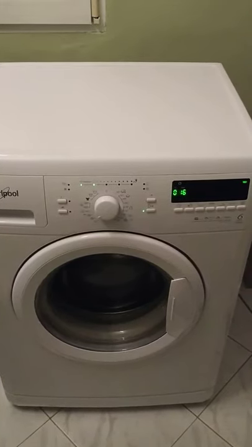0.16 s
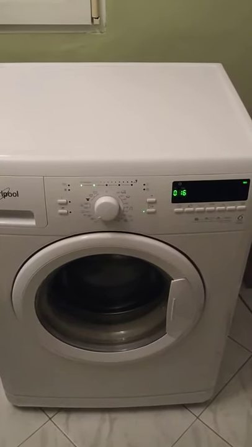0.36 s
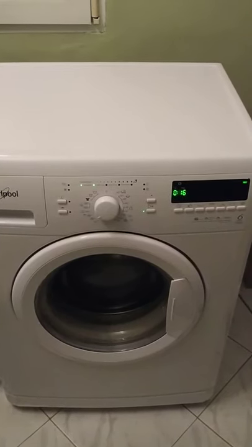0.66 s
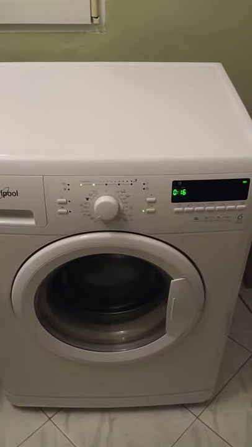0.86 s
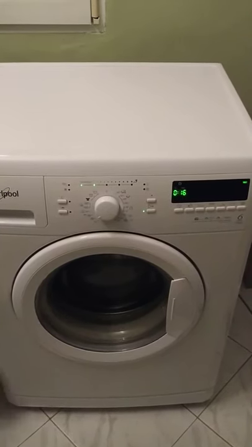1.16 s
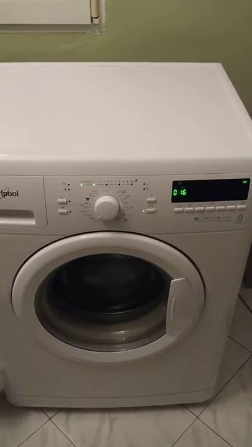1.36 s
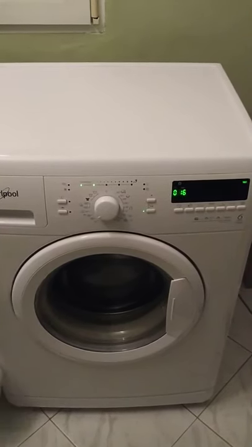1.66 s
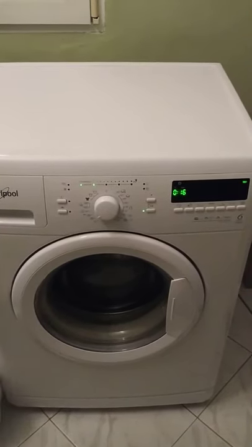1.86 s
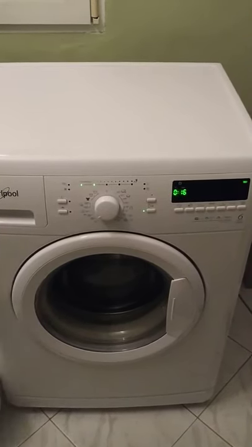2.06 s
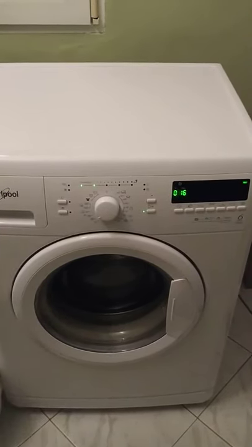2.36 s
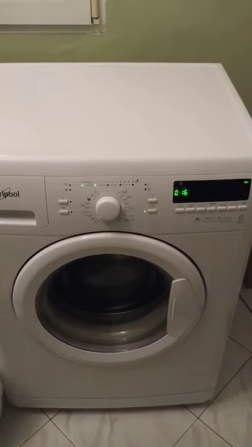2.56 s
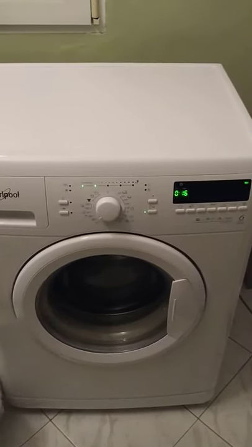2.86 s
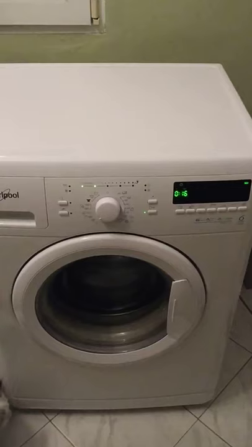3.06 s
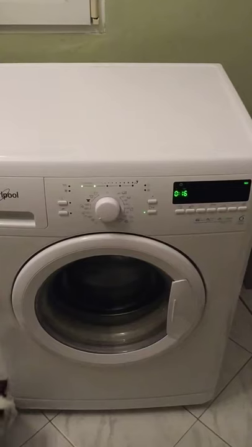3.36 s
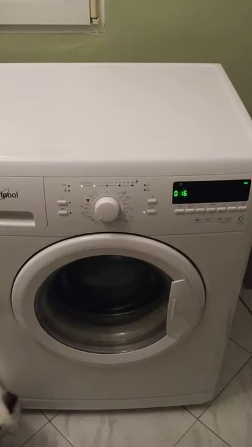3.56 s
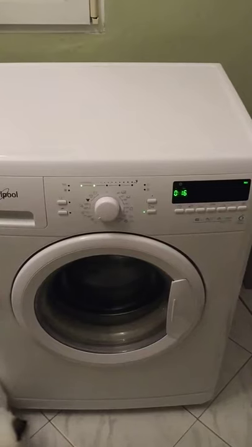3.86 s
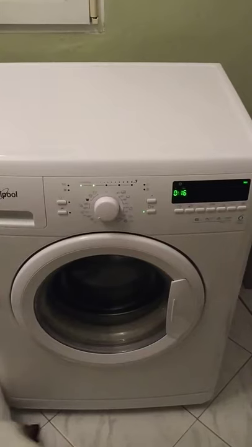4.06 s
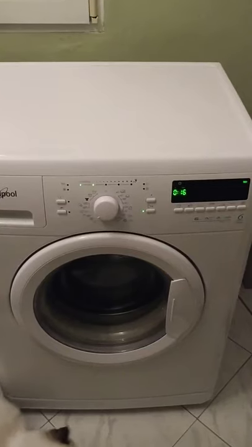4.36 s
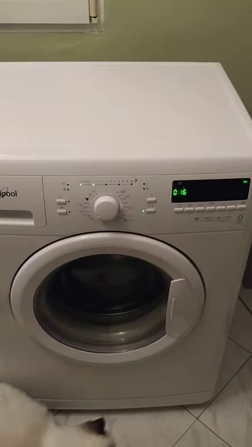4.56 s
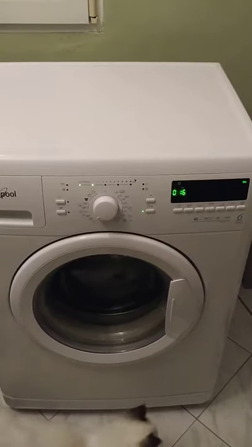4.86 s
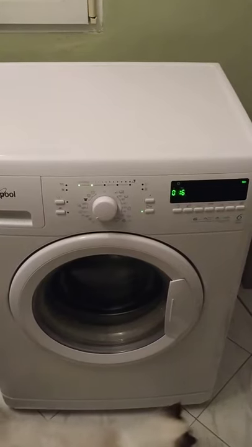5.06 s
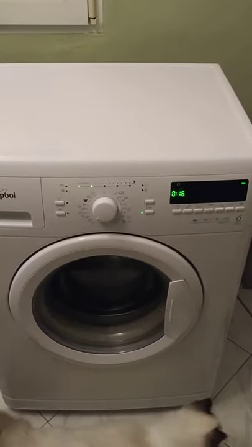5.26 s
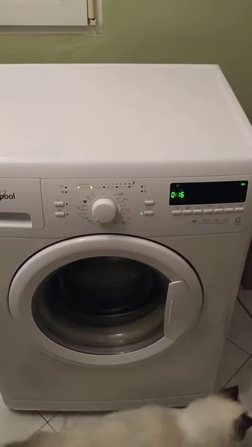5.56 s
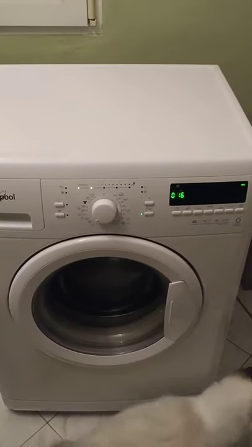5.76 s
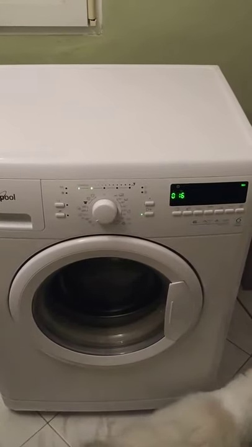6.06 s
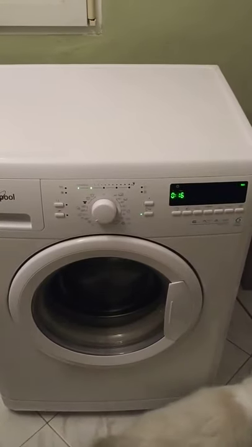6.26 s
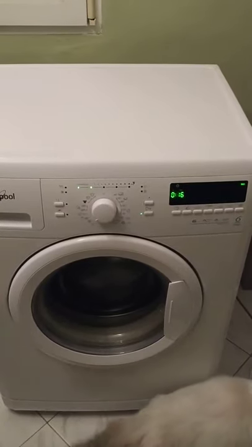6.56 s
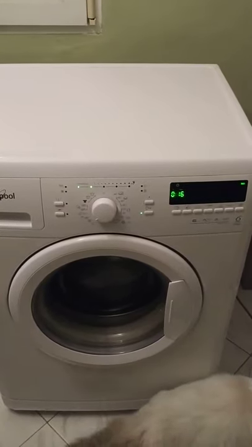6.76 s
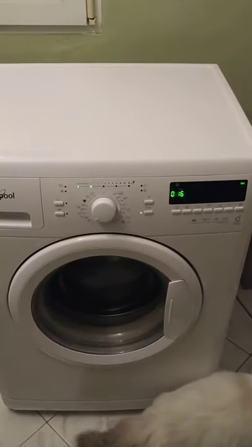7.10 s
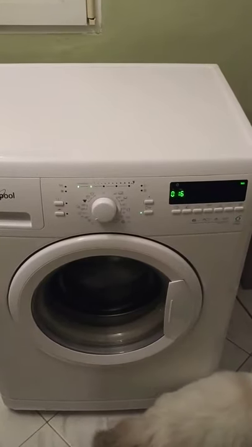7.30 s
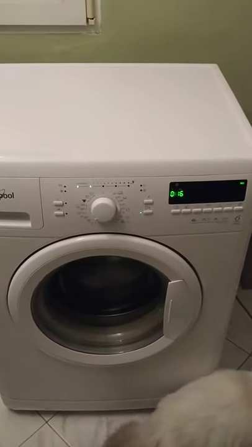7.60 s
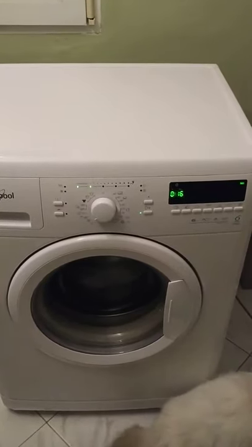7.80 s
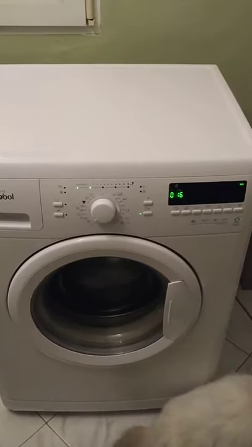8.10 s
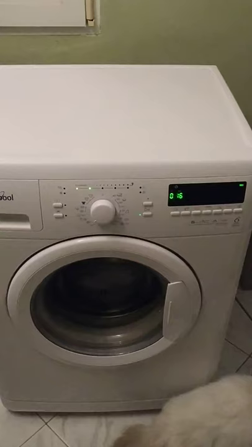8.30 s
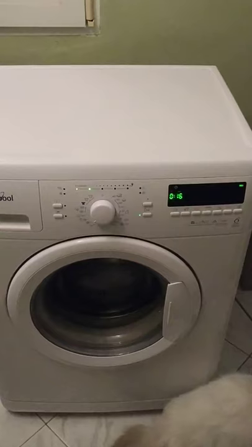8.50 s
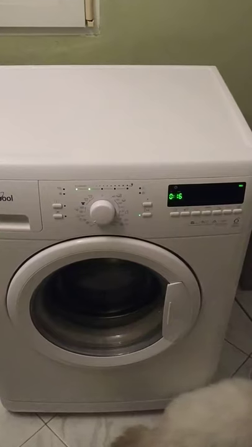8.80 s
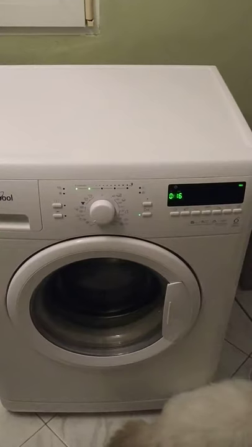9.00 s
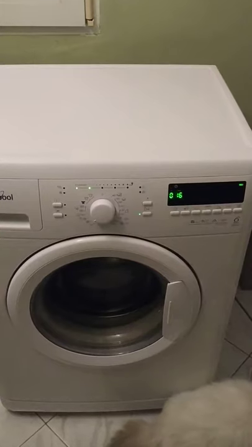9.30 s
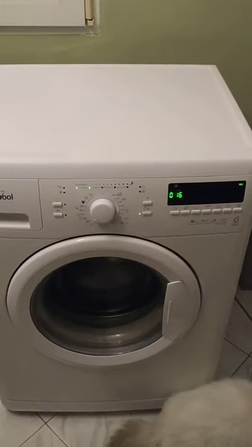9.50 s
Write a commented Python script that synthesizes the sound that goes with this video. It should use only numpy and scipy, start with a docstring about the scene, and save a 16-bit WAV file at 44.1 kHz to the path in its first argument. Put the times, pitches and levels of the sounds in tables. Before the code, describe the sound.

A front-loading washing machine is already running at the start, heard close up on a handheld stereo microphone in a small tiled room. The main sound is a high, thin motor whine that climbs slowly and evenly in pitch as the drum speeds up, with fainter tones and a light hiss rising along with it. Its loudness wavers, and it becomes clearly stronger from about 3.5 seconds. At around 6.7 seconds the pitch stops rising, and the whine holds there with a quick, uneven flutter until the end, at about 9.6 seconds. Underneath, from start to finish, the drain pump gives a steady low hum with a slight throb. A soft, continuous rush of air and water fills in behind, growing a little fuller at around 5 seconds.

```python
"""Washing machine spinning up

A front-loader in a small tiled room, close to a handheld stereo microphone. The brush motor's
commutator whines ever higher, then holds; shaft orders comb through air and water noise.
Underneath, the drain pump hums at multiples of the mains frequency."""
import sys
import numpy as np
from scipy import signal
from scipy.fft import rfft, irfft, next_fast_len
from scipy.io import wavfile
from scipy.ndimage import uniform_filter1d

SR = 44100
rng = np.random.default_rng(int(sys.argv[2]) if len(sys.argv) > 2 else 0)


def unload_wav(signal):
    """Save mono or channel-first audio to the path in sys.argv[1] as 16-bit WAV at rate SR, clipped to [-1, 1]."""
    wavfile.write(
        sys.argv[1],
        SR,
        np.round(np.clip(np.atleast_2d(signal).T, -1, 1) * 32767).astype(np.int16),
    )


N = 425124
TIME = np.arange(N) / SR
BARS = 36  # commutator tone k lies at k * BARS times the shaft speed
LEFT_LEAD_SAMPLES = 8  # the left capsule hears the machine first


# First tone in the room's standing waves: (frequency [Hz], left [dB], right [dB], left lead [rad])
STANDING_WAVES = [(2402.7, -62, -57, 5.9), (2403.9, -55, -54, 7.6), (2406.3, -64, -54, 5.1),
                  (2408.8, -56, -56, 3.1), (2413.7, -49, -51, 1.1), (2417.3, -64, -50, 1.3),
                  (2424.0, -50, -52, 2.3), (2428.9, -48, -50, 0.8), (2436.9, -49, -53, 1.5),
                  (2439.9, -51, -51, 3.0), (2444.8, -47, -60, 3.8), (2450.2, -49, -51, 3.2),
                  (2453.9, -46, -64, 6.5), (2460.6, -48, -50, 8.7), (2463.8, -47, -53, 8.5),
                  (2467.4, -51, -50, 9.1), (2474.2, -50, -55, 9.2), (2478.4, -54, -58, 8.3),
                  (2482.0, -53, -64, 4.8), (2493.5, -56, -46, 7.1), (2500.2, -51, -46, 5.0),
                  (2504.9, -47, -54, 3.3), (2507.5, -47, -50, 3.2), (2511.2, -46, -52, 3.0),
                  (2514.8, -46, -47, 3.2), (2517.9, -48, -49, 3.1), (2520.5, -58, -57, 3.6),
                  (2523.7, -49, -50, 3.4), (2526.3, -49, -49, 3.4), (2530.4, -56, -61, 4.2),
                  (2534.6, -64, -64, 2.9), (2538.2, -54, -54, 3.3), (2544.5, -50, -58, 1.2),
                  (2551.8, -51, -60, 0.9), (2554.9, -60, -47, 1.8), (2557.6, -63, -55, -2.4),
                  (2560.3, -64, -48, -2.4), (2563.6, -56, -50, -2.7), (2566.2, -58, -47, -3.0),
                  (2569.5, -49, -44, -2.6), (2573.8, -53, -44, -2.0), (2577.0, -54, -45, -2.1),
                  (2580.8, -52, -56, 2.8), (2583.5, -59, -49, 5.0), (2585.1, -52, -52, 4.9),
                  (2587.3, -50, -62, 4.0), (2590.5, -52, -53, 4.3), (2593.7, -48, -57, 4.1),
                  (2600.7, -49, -50, 6.3), (2607.7, -48, -47, 8.6), (2610.4, -51, -52, 9.1),
                  (2612.6, -51, -57, 9.1), (2616.8, -49, -50, 9.5), (2619.0, -49, -52, 10.1),
                  (2622.7, -52, -54, 9.9), (2627.0, -47, -55, 10.0), (2632.9, -56, -58, 10.3),
                  (2637.7, -63, -54, 12.0), (2640.4, -52, -60, 11.4), (2644.1, -54, -60, 9.5),
                  (2646.8, -57, -53, 8.3), (2650.6, -64, -53, 9.3), (2654.3, -49, -49, 9.3),
                  (2657.0, -56, -50, 9.6), (2659.1, -52, -52, 9.4), (2665.5, -56, -50, 9.6),
                  (2668.2, -53, -58, 10.4), (2670.4, -57, -64, 9.3), (2672.5, -53, -51, 9.1),
                  (2674.1, -51, -49, 9.5), (2678.4, -53, -60, 10.7), (2681.1, -63, -59, 13.7),
                  (2684.8, -55, -55, 11.6), (2689.6, -62, -55, 10.8), (2696.6, -48, -50, 10.4),
                  (2701.4, -47, -51, 10.4), (2707.3, -50, -64, 9.7), (2713.2, -55, -62, 9.6),
                  (2722.9, -45, -47, 9.5), (2726.1, -49, -51, 9.7), (2728.8, -47, -46, 9.4),
                  (2733.6, -54, -48, 8.5), (2737.9, -56, -54, 9.2), (2742.8, -63, -52, 6.8),
                  (2746.0, -57, -46, 6.8), (2748.2, -50, -50, 6.2), (2751.4, -52, -55, 5.5),
                  (2754.6, -46, -49, 3.4), (2758.4, -48, -55, 4.2), (2761.6, -49, -48, 3.2),
                  (2764.9, -49, -45, 3.4), (2770.8, -41, -41, 2.5), (2774.5, -41, -43, 2.6),
                  (2784.1, -43, -44, 1.6), (2786.2, -46, -43, 1.1), (2788.9, -61, -48, 1.3),
                  (2791.0, -55, -45, 3.4), (2793.1, -63, -47, 1.7), (2801.1, -48, -45, 2.9),
                  (2804.8, -55, -43, 2.8), (2809.6, -46, -42, 3.2), (2812.8, -48, -47, 3.6),
                  (2815.4, -43, -44, 3.0), (2823.4, -49, -53, 3.3), (2825.1, -52, -55, 5.5),
                  (2826.7, -59, -47, 6.0), (2829.4, -57, -50, 5.4), (2831.6, -64, -45, 7.6),
                  (2834.8, -56, -44, 14.6), (2836.4, -41, -41, 15.3), (2838.1, -39, -39, 15.4),
                  (2843.5, -39, -40, 15.3), (2848.4, -38, -41, 16.0), (2853.3, -39, -42, 15.7),
                  (2857.1, -38, -45, 16.3), (2863.0, -36, -48, 16.0), (2866.8, -38, -45, 16.3),
                  (2870.6, -38, -56, 15.8), (2873.9, -40, -48, 15.1), (2878.7, -45, -46, 15.7),
                  (2883.6, -36, -41, 16.4), (2889.0, -36, -46, 16.9), (2891.1, -36, -47, 17.0),
                  (2892.7, -38, -44, 17.0), (2893.8, -43, -42, 16.9), (2895.4, -52, -43, 15.2),
                  (2897.6, -49, -43, 13.4), (2900.3, -57, -41, 14.0), (2906.8, -44, -41, 14.4),
                  (2912.1, -49, -48, 14.7), (2914.3, -51, -52, 15.7), (2915.9, -52, -58, 18.5),
                  (2919.1, -51, -45, 20.6), (2922.9, -51, -45, 19.7), (2925.6, -57, -43, 20.6),
                  (2928.8, -44, -50, 23.1), (2930.5, -42, -53, 24.5), (2933.1, -45, -64, 27.0),
                  (2935.8, -47, -58, 27.8), (2939.0, -46, -51, 25.3), (2941.6, -45, -55, 24.9),
                  (2944.8, -43, -44, 24.3), (2946.9, -42, -44, 24.1), (2949.6, -41, -45, 23.3),
                  (2951.7, -42, -42, 22.1), (2953.9, -46, -40, 22.1), (2958.1, -42, -41, 22.7),
                  (2959.7, -41, -39, 22.2), (2961.3, -43, -40, 21.4), (2963.4, -62, -44, 20.7),
                  (2966.6, -57, -49, 22.8), (2968.7, -53, -48, 22.9), (2971.9, -48, -53, 21.8),
                  (2973.5, -47, -50, 21.7), (2977.2, -47, -46, 19.7), (2979.9, -59, -43, 19.1),
                  (2983.1, -64, -48, 16.0), (2986.3, -59, -44, 15.5), (2989.5, -59, -48, 15.9),
                  (2991.1, -64, -45, 18.2), (2993.2, -52, -48, 20.6), (2994.8, -57, -41, 22.4),
                  (2996.4, -50, -40, 23.7), (2998.5, -47, -41, 23.7), (3003.8, -50, -40, 23.1),
                  (3007.5, -50, -48, 23.4), (3011.3, -47, -43, 23.4), (3014.5, -44, -46, 22.1),
                  (3016.6, -54, -47, 20.4), (3021.4, -64, -44, 19.7), (3026.2, -45, -44, 22.4),
                  (3027.7, -40, -44, 22.1), (3028.8, -40, -43, 21.9), (3030.9, -43, -40, 22.1),
                  (3034.1, -39, -39, 22.4), (3038.4, -36, -40, 22.1), (3045.1, -35, -39, 22.0),
                  (3047.3, -37, -42, 21.4), (3049.0, -43, -43, 20.3), (3050.1, -46, -43, 20.6),
                  (3052.9, -40, -46, 21.4), (3055.1, -43, -43, 21.1), (3057.3, -42, -45, 21.0),
                  (3058.5, -44, -46, 21.1), (3060.1, -61, -43, 22.2), (3061.8, -50, -39, 22.3),
                  (3063.5, -50, -38, 21.1), (3066.8, -48, -38, 20.4), (3069.0, -60, -39, 22.2),
                  (3070.7, -45, -40, 23.4), (3072.4, -42, -38, 23.5), (3075.7, -46, -37, 24.0),
                  (3080.2, -37, -39, 24.4), (3081.8, -36, -39, 25.1), (3083.0, -37, -39, 25.4),
                  (3085.8, -45, -47, 25.3), (3090.3, -37, -47, 24.4), (3092.5, -39, -42, 25.2),
                  (3094.8, -47, -41, 26.3), (3096.5, -42, -42, 26.5), (3100.4, -39, -43, 26.8),
                  (3105.5, -38, -39, 26.1), (3112.2, -41, -38, 26.2), (3113.9, -45, -36, 26.2),
                  (3115.0, -55, -36, 25.8), (3116.2, -51, -38, 22.7), (3116.8, -43, -40, 21.7),
                  (3118.4, -42, -37, 21.2), (3120.3, -44, -39, 21.7), (3123, -42, -38, 21.1)]
# Added at full speed as the hand shifts: (time [s], left [dB], right [dB], left lead [rad])
HAND_SHIFT = [(6.7, 0, 0, 0), (6.8, -0.2, -0.9, 0.01), (7.0, -2.1, -1.4, -0.04), (7.2, -1.8, -0.7, 0.39),
              (7.4, -1.1, -0.7, 0.42), (7.6, -4.0, -1.7, 0.34), (7.8, -4.2, -2.5, 0.35),
              (8.0, -4.9, -3.3, 0.18), (8.2, -6.2, -3.5, -0.01), (8.4, -2.6, -2.7, -0.14),
              (8.6, -1.5, -2.4, -0.13), (8.8, -1.7, -1.8, 0.1), (9.0, -2.1, -0.9, 0.19),
              (9.2, -0.4, -0.4, 0.27), (9.4, 0.5, 0.1, 0.41), (9.6, -0.0, -0.0, 0.33)]
# Second tone at the microphone, before flutter: (time [s], left [dB], right [dB], left lead [rad])
SECOND_TONE = [(0.02, -59, -57, 0.3), (0.07, -51, -55, 1.0), (0.12, -59, -63, 1.3), (0.23, -66, -60, 1.7),
               (0.29, -59, -60, -2.2), (0.37, -56, -51, -2.0), (0.4, -56, -53, -1.9), (0.45, -60, -56, 0.5),
               (0.49, -54, -55, 3.3), (0.55, -50, -63, 4.9), (0.58, -51, -58, 2.6), (0.62, -50, -65, 3.4),
               (0.66, -54, -67, 3.6), (0.7, -57, -54, 5.6), (0.74, -56, -52, 5.5), (0.86, -59, -62, 7.8),
               (0.92, -50, -65, 6.0), (0.98, -49, -59, 4.4), (1.03, -51, -58, 5.2), (1.1, -59, -68, 9.0),
               (1.14, -55, -68, 11.7), (1.22, -60, -67, 13.2), (1.26, -57, -58, 10.4),
               (1.29, -58, -57, 9.5), (1.32, -57, -56, 7.2), (1.4, -57, -58, 7.2), (1.43, -62, -66, 9.4),
               (1.48, -59, -61, 8.5), (1.5, -60, -60, 9.6), (1.54, -54, -61, 9.8), (1.59, -64, -58, 12.5),
               (1.63, -58, -62, 13.2), (1.74, -67, -67, 22.1), (1.82, -59, -68, 24.9),
               (1.88, -57, -57, 22.2), (1.92, -60, -61, 22.8), (1.97, -59, -58, 22.2),
               (2.02, -56, -61, 28.1), (2.05, -54, -62, 29.5), (2.1, -61, -67, 27.2),
               (2.14, -60, -62, 22.1), (2.18, -56, -59, 21.4), (2.21, -56, -56, 22.0),
               (2.23, -54, -55, 22.6), (2.39, -58, -63, 23.6), (2.49, -52, -60, 25.1),
               (2.6, -58, -53, 27.9), (2.64, -58, -52, 27.9), (2.67, -53, -52, 28.4), (2.7, -56, -57, 26.8),
               (2.75, -60, -54, 26.5), (2.82, -61, -59, 27.8), (2.88, -68, -65, 25.2),
               (2.93, -54, -57, 23.6), (2.98, -58, -54, 22.9), (3.01, -54, -55, 23.5),
               (3.03, -52, -57, 22.4), (3.07, -51, -61, 24.8), (3.18, -59, -62, 28.1),
               (3.23, -54, -56, 28.0), (3.34, -59, -67, 32.7), (3.43, -56, -55, 33.2),
               (3.5, -57, -55, 34.5), (3.53, -61, -54, 34.6), (3.59, -62, -60, 33.8),
               (3.63, -61, -55, 33.1), (3.68, -65, -60, 33.5), (3.75, -66, -63, 29.2),
               (3.82, -68, -52, 30.8), (3.88, -59, -55, 31.8), (3.92, -62, -64, 33.5),
               (4.09, -68, -65, 29.8), (4.17, -57, -62, 28.3), (4.2, -60, -59, 29.9),
               (4.24, -62, -57, 27.8), (4.3, -59, -60, 25.4), (4.36, -59, -57, 22.7), (4.4, -59, -64, 27.0),
               (4.51, -60, -55, 25.3), (4.55, -65, -59, 28.5), (4.68, -52, -57, 29.9),
               (4.72, -57, -67, 33.1), (4.76, -53, -61, 36.3), (4.89, -66, -64, 38.4),
               (4.94, -58, -58, 37.8), (4.96, -59, -61, 40.7), (5.14, -49, -65, 48.8),
               (5.34, -56, -58, 53.3), (5.39, -50, -65, 55.7), (5.56, -52, -55, 53.6),
               (5.61, -52, -60, 55.8), (5.64, -54, -56, 53.8), (5.67, -52, -59, 54.9),
               (5.71, -55, -51, 54.0), (5.78, -53, -48, 54.1), (5.81, -48, -50, 56.4),
               (5.88, -47, -49, 56.5), (5.91, -51, -55, 56.6), (6.11, -51, -66, 56.2),
               (6.14, -56, -60, 56.5), (6.2, -50, -59, 59.5), (6.24, -54, -61, 59.4),
               (6.28, -48, -58, 59.9), (6.32, -52, -53, 59.6), (6.37, -48, -56, 58.7),
               (6.42, -56, -54, 58.5), (6.44, -57, -55, 59.8), (6.47, -53, -53, 57.6),
               (6.54, -56, -55, 57.5), (6.6, -47, -54, 56.2), (6.78, -45, -55, 56.3), (7.0, -48, -49, 56.1),
               (7.3, -52, -51, 56.3), (7.63, -50, -51, 56.0), (7.96, -48, -52, 56.0),
               (8.29, -47, -54, 56.1), (8.62, -46, -54, 56.3), (8.95, -45, -54, 56.0),
               (9.28, -45, -56, 56.1), (9.62, -44, -56, 56.3)]
# The tones flutter fully once the speed holds: (time [s], depth [share])
FLUTTER_DEPTH = [(6.65, .15), (6.75, 1)]
def commutator_whine(speed, steady_angle, angle):
    """Brushes cross the bars in two strong tones; standing waves set the level at each capsule."""
    hz, *standing = np.transpose(STANDING_WAVES)
    left_db, right_db, lead = [np.interp(BARS * speed, hz, column) + shift
                               for column, shift in zip(standing, curves(HAND_SHIFT))]
    *second_db, lead2 = curves(SECOND_TONE)
    left2_db, right2_db = [db - .4 + drift(hz=6.9) for db in second_db]
    depth = curves(FLUTTER_DEPTH)[0]
    lead = lead + .13 * drift(hz=14)
    lead2 = lead2 + .3 * depth * drift(hz=14)
    left_flutter, right_flutter, flutter2 = [depth * load_flutter(steady_angle, belt_share)
                                             for belt_share in (.5, .5, .9)]
    first = stereo_tone(BARS * angle, lead, left_db + 5.5 * left_flutter, right_db + 2.3 * right_flutter)
    second = stereo_tone(2 * BARS * angle, lead2, left2_db + 5 * flutter2, right2_db + 4.5 * flutter2)
    return first + second


# The motor climbs, overshoots slightly and settles: (time [s], shaft speed [turns/s])
SPIN_UP = [(0.0, 66.69), (0.4, 68.05), (0.9, 69.5), (1.4, 70.95), (1.9, 72.45), (2.4, 73.94), (2.9, 75.43),
           (3.4, 76.93), (3.9, 78.41), (4.4, 79.92), (4.9, 81.42), (5.4, 82.9), (5.9, 84.38), (6.3, 85.62),
           (6.6, 86.56), (6.8, 86.79), (7.2, 86.96), (7.6, 86.9), (8.6, 86.81), (9.64, 86.78)]
# Load swings of drum, belt and half a belt turn: (period [shaft turns], swing [shaft turns])
LOAD_SWINGS = [(13.0, .0021), (8.43, .0012), (4.21, .0004)]
def motor_shaft():
    """Shaft speed, and its angle in turns without and with the swing of drum and belt load."""
    speed = curves(SPIN_UP)[0]
    steady_angle = np.cumsum(speed) / SR
    swing = sum(size * random_sine(steady_angle / period) for period, size in LOAD_SWINGS)
    return speed, steady_angle, steady_angle + swing + .0004 * drift(hz=25)


def load_flutter(steady_angle, belt_share):
    """Drum and belt shake the whine's level: flat swells broken by sudden dips."""
    drum = random_sine(steady_angle / LOAD_SWINGS[0][0])
    belt = random_sine(steady_angle / LOAD_SWINGS[1][0])
    return np.minimum(.6 * drum + belt_share * belt + .6 * drift(hz=30), .3) + .3


# Two low orders and the third to fifth commutator tones: (order [cycles/turn])
STRONG_ORDERS = [13, 18, 108, 144, 180]
# Their rise and fall near the machine: (time [s], relative level of each order [dB])
STRONG_LEVELS = [(0.0, -67.0, -80.0, -66.0, -68.0, -65.0), (0.45, -62.0, -71.0, -63.0, -62.0, -63.0),
                 (0.9, -63.0, -73.0, -62.0, -63.0, -67.0), (1.35, -70.0, -73.0, -62.0, -62.0, -68.0),
                 (1.8, -73.0, -73.0, -61.0, -62.0, -69.0), (2.1, -74.0, -74.0, -56.0, -59.0, -64.0),
                 (2.3, -75.0, -74.0, -56.0, -67.0, -62.0), (2.55, -76.0, -75.0, -62.0, -59.0, -65.0),
                 (2.85, -77.0, -75.0, -63.0, -69.0, -69.0), (3.15, -76.0, -70.0, -67.0, -69.0, -71.0),
                 (3.4, -75.0, -70.0, -60.0, -62.0, -74.0), (3.6, -74.0, -71.0, -65.0, -66.0, -70.0),
                 (3.9, -76.0, -69.0, -53.0, -67.0, -65.0), (4.05, -76.0, -68.0, -57.0, -59.0, -67.0),
                 (4.2, -76.0, -67.0, -64.0, -58.0, -68.0), (4.35, -76.0, -66.0, -61.0, -59.0, -69.0),
                 (4.5, -76.0, -66.0, -59.0, -68.0, -71.0), (4.95, -76.0, -70.0, -65.0, -65.0, -70.0),
                 (5.2, -79.0, -69.0, -69.0, -63.0, -70.0), (5.55, -79.0, -67.0, -68.0, -67.0, -72.0),
                 (5.7, -77.0, -65.0, -64.0, -59.0, -69.0), (5.85, -76.0, -64.0, -58.0, -63.0, -71.0),
                 (6.3, -77.0, -64.0, -65.0, -63.0, -74.0), (6.75, -76.0, -69.0, -64.0, -64.0, -76.0),
                 (7.2, -75.0, -71.0, -64.0, -65.0, -68.0), (8.0, -77.0, -69.0, -66.0, -65.0, -72.0),
                 (8.8, -78.0, -69.0, -67.0, -62.0, -72.0), (9.64, -77.0, -70.0, -65.0, -62.0, -76.0)]
def strong_orders(angle):
    """The motor sings at five multiples of its shaft speed, each wavering a little."""
    return amp(.8) * sum(tone(order * angle, db + 1.5 * drift(hz=2))
                         for order, db in zip(STRONG_ORDERS, curves(STRONG_LEVELS)))


# Mains sidebands of the whine: (commutator tone [number], offset [Hz])
SIDE_TONES = [(1, -200), (1, -100), (1, 100), (1, 200), (3, -200)]
# Each swells as it sweeps past panel resonances: (time [s], relative level of each [dB])
SIDE_LEVELS = [(0.0, -59.0, -55.0, -67.0, -60.0, -85.0), (0.3, -63.0, -61.0, -64.0, -68.0, -83.0),
               (0.6, -58.0, -68.0, -65.0, -65.0, -83.0), (0.9, -60.0, -63.0, -62.0, -68.0, -76.0),
               (1.2, -61.0, -60.0, -72.0, -69.0, -83.0), (1.5, -68.0, -65.0, -65.0, -66.0, -81.0),
               (1.8, -65.0, -59.0, -67.0, -66.0, -77.0), (2.15, -63.0, -53.0, -68.0, -69.0, -78.0),
               (2.4, -66.0, -56.0, -64.0, -62.0, -75.0), (2.7, -63.0, -55.0, -66.0, -66.0, -81.0),
               (3.0, -58.0, -59.0, -68.0, -65.0, -80.0), (3.3, -59.0, -59.0, -63.0, -67.0, -75.0),
               (3.6, -59.0, -57.0, -64.0, -64.0, -78.0), (3.9, -60.0, -62.0, -66.0, -69.0, -83.0),
               (4.2, -62.0, -59.0, -65.0, -68.0, -79.0), (4.5, -60.0, -59.0, -65.0, -61.0, -77.0),
               (4.8, -62.0, -62.0, -66.0, -58.0, -78.0), (5.1, -64.0, -63.0, -66.0, -59.0, -83.0),
               (5.4, -66.0, -60.0, -61.0, -61.0, -76.0), (5.7, -68.0, -60.0, -57.0, -63.0, -73.0),
               (6.0, -65.0, -60.0, -60.0, -60.0, -72.0), (6.3, -63.0, -60.0, -61.0, -57.0, -72.0),
               (6.6, -68.0, -58.0, -61.0, -60.0, -65.0), (7.2, -66.0, -66.0, -60.0, -63.0, -60.0),
               (7.8, -67.0, -62.0, -62.0, -61.0, -61.0), (8.4, -68.0, -62.0, -65.0, -60.0, -62.0),
               (9.0, -68.0, -59.0, -64.0, -59.0, -63.0), (9.6, -64.0, -59.0, -62.0, -58.0, -61.0)]
# The first four across the microphone: (time [s], left lead of each [rad])
SIDE_LEADS = [(0.05, 2.04, -2.72, 0.82, -2.64), (0.3, 4.61, -3.15, 0.72, -3.66),
              (0.55, 6.31, -3.74, 2.52, -2.84), (0.8, 8.01, -5.4, 0.08, -2.36),
              (1.05, 9.78, -4.41, -1.55, -2.61), (1.3, 7.61, -1.83, -3.97, -3.86),
              (1.55, 9.1, -0.46, -2.88, -2.59), (1.8, 6.99, -0.72, -2.3, 0.05),
              (2.05, 8.28, 1.3, -4.45, 2.86), (2.3, 10.87, 1.32, -2.17, 4.28),
              (2.55, 10.97, 0.8, -5.22, 6.28), (2.8, 13.35, 3.75, -5.24, 7.19),
              (3.05, 13.68, 4.15, -2.81, 4.46), (3.3, 14.14, 3.43, -1.44, 6.48),
              (3.55, 14.32, 3.53, -2.99, 6.56), (3.8, 16.67, 0.93, -4.39, 9.39),
              (4.05, 15.54, 1.02, -2.09, 9.97), (4.3, 15.93, -0.77, 0.63, 7.23),
              (4.55, 16.04, -0.18, 0.31, 7.83), (4.8, 13.92, 0.09, 0.32, 9.03),
              (5.05, 12.4, -2.66, 3.15, 9.53), (5.3, 14.83, -0.03, 5.28, 7.4),
              (5.55, 13.9, 0.41, 8.36, 8.39), (5.8, 15.49, 3.2, 9.22, 8.79),
              (6.05, 15.51, 5.88, 10.47, 8.12), (6.3, 16.41, 7.29, 13.06, 8.97),
              (6.55, 16.48, 9.27, 14.77, 10.26), (7.0, 16.12, 12.34, 15.86, 10.73),
              (7.5, 16.57, 12.61, 15.35, 10.53), (8.0, 16.76, 12.07, 15.7, 10.79),
              (8.5, 15.5, 11.19, 15.69, 10.2), (9.0, 15.71, 11.22, 15.07, 10.35),
              (9.5, 15.55, 10.25, 15.14, 10.62)]
def side_tones(angle):
    """Mains current beats with the whine, making side tones that waver apart at the two capsules."""
    out = np.zeros((2, N))
    leads = curves(SIDE_LEADS) + [5.5]  # rad, for the fifth side tone
    for (k, offset_hz), db, lead in zip(SIDE_TONES, curves(SIDE_LEVELS), leads):
        lead = lead + .35 * drift(hz=3)
        waver_db = 2.5 * drift(hz=8)
        out += stereo_tone(k * BARS * angle + offset_hz * TIME, lead, db + waver_db, db + waver_db[::-1])
    return out


# Weak mains sidebands: (commutator tone [number], offset [Hz], relative level [dB])
FAINT_SIDE_TONES = [(2, -100, -86), (2, 100, -92), (3, -100, -69), (3, 100, -66.5), (3, 200, -68),
                    (4, 100, -92)]
def faint_tones(angle):
    """Weak side tones, and the sixth commutator tone, heard until it climbs out of the band."""
    sidebands = sum(tone(k * BARS * angle + hz * TIME, db) for k, hz, db in FAINT_SIDE_TONES)
    return tone(6 * BARS * angle, db=-70) + sidebands


# Hiss at the brushes: (commutator tone [number], relative level [dB])
SPARKING = [(1, -63), (2, -65), (3, -63), (4, -66), (5, -71)]
def brush_sparking(angle):
    """Sparks spread a narrow band of hiss around each commutator tone."""
    return sum(tone(k * BARS * angle, db) * drift(hz=170.6) for k, db in SPARKING)


# The motor's lesser tones: (order [cycles/turn], relative level [dB])
LESSER_ORDERS = [(19, -72), (20, -76), (21, -79), (22, -71), (24, -73), (25, -72), (26, -75), (27, -72),
                 (28, -71), (29, -74), (31, -74), (32, -74), (34, -69), (35, -67), (37, -67), (38, -67),
                 (39, -71), (40, -68), (41, -72), (42, -78), (43, -79), (44, -73), (45, -68), (46, -67),
                 (47, -70), (48, -77), (49, -70), (50, -71), (51, -73), (52, -78), (53, -67), (54, -67),
                 (55, -69), (56, -77), (57, -78), (58, -71), (59, -75), (60, -71), (61, -72), (62, -68),
                 (63, -68), (64, -70), (65, -71), (68, -70), (69, -78), (70, -71), (71, -65), (73, -71),
                 (74, -68), (76, -72), (77, -75), (79, -79), (80, -80), (81, -72), (82, -74), (83, -79),
                 (85, -76), (86, -78), (87, -75), (89, -75), (90, -72), (91, -77), (94, -78), (95, -79),
                 (96, -80), (97, -79), (98, -73), (99, -76), (100, -78), (104, -80), (105, -78), (106, -73),
                 (107, -72), (110, -73), (112, -76), (113, -80), (117, -75), (118, -75), (122, -79),
                 (125, -80), (126, -74), (127, -80), (130, -80), (131, -77), (134, -79), (135, -79),
                 (146, -75), (148, -79), (153, -80), (162, -77)]
# The cabinet radiates them unevenly into the room: (frequency [Hz], gain [dB])
CABINET_RADIATION = [(1300.0, -1.5), (2200.0, 0.1), (3000.0, -1.2), (3400.0, -2.5), (3700.0, 0.6),
                     (4000.0, 4.3), (4300.0, 2.6), (4600.0, 1.1), (4900.0, -2.1), (5200.0, -0.4),
                     (5600.0, -3.8), (6000.0, -3.7), (6600.0, -0.6), (7300.0, 4.8), (8000.0, 1.4),
                     (9000.0, -1.1), (10000.0, 2.0), (11500.0, 1.8), (13000.0, -0.7), (15000.0, -1.3)]
def lesser_orders(speed, angle, step_s=.15, spread_db=4):
    """A comb of shaft harmonics, each gliding to a new chance level every step."""
    steps = np.arange(0, TIME[-1] + step_s, step_s)
    step_speed = np.interp(steps, TIME, speed)
    comb = np.zeros(N)
    for order, db in LESSER_ORDERS:
        harmonic = np.sqrt(2) * random_sine(order * angle)
        radiated_db = db + spectrum_at(CABINET_RADIATION, order * step_speed)
        chance_db = spread_db * rng.standard_normal(len(steps))
        comb += harmonic * np.interp(TIME, steps, amp(radiated_db + chance_db))
    return amp(-1.1) * comb


def brush_scrape(angle, low_cut_hz=6100):
    """The brushes ride over the same uneven copper every turn: noise that repeats with the shaft."""
    copper = signal.resample(rng.standard_normal(480), 7680)
    scrape = copper[(angle % 1 * len(copper)).astype(int)]
    hz = np.fft.rfftfreq(N, 1 / SR)
    colour = amp(spectrum_at(RUSH_SPECTRUM, hz)) * hz ** 2 / (hz ** 2 + low_cut_hz ** 2)
    return amp(-65) * unit_rms(irfft(rfft(scrape) * colour, N))


# Hum at the microphone: (mains multiple [number], start [dB], end [dB], left-right [dB], left lead [rad])
PUMP_HUM = [(1, -54.5, -52, .2, -.05), (2, -54, -52.5, 1.8, -0.082), (3, -45, -44, -1.2, -0.034)]
# Two tones beside the mains tone make it throb: (frequency [Hz])
THROB_HZ = [48.08, 52.43]
# Their beats with the mains tone: (time of a crest [s], level [dB])
THROB_CRESTS = [(.103, -65), (.218, -65.5)]
# The pump tone near 500 Hz swells: (time [s], level [dB])
PUMP_SWELL = [(5.5, -80), (6.1, -70), (6.7, -63), (7.3, -70), (9.64, -68)]
# Weaker pump tones: (frequency [Hz], level [dB])
PUMP_TONES = [(27, -72), (117.5, -65), (120.6, -72), (132.5, -66), (167.4, -74), (199.7, -68), (250.2, -73),
              (307, -70), (333.3, -70), (395, -68), (417, -67)]
def drain_pump(mains_hz=49.99):
    """The pump hums at mains multiples, with a pair beating against the lowest and weaker tones around."""
    hum = np.zeros((2, N))
    for k, start_db, end_db, tilt_db, lead in PUMP_HUM:
        db = start_db + (end_db - start_db) * TIME / TIME[-1] + .5 * drift(hz=6.3)
        hum += stereo_tone(k * mains_hz * TIME, lead, db + tilt_db / 2, db - tilt_db / 2)
    throb = sum(tone(mains_hz * TIME + (hz - mains_hz) * (TIME - crest_s), db)
                for hz, (crest_s, db) in zip(THROB_HZ, THROB_CRESTS))
    swell = tone(499.5 * TIME, curves(PUMP_SWELL)[0] + 2.7 * drift(hz=3))
    weak = sum(tone(hz * TIME + rng.random(), db + drift(hz=4.3)) for hz, db in PUMP_TONES)
    return hum + throb + swell + weak


# Air and water close by; also colours the brush scrape: (frequency [Hz], relative density [dB])
RUSH_SPECTRUM = [(12, -11), (38, -31), (130, -10.5), (240, -19.5), (760, -16), (1150, -24), (3400, -17.5),
                 (4300, -19.5), (6300, -25), (7500, -17), (8600, -24.5), (9800, -22.5), (14200, -30.5),
                 (15700, -49)]
# The rush through the spin: (time [s], relative level [dB], boost of the low roar [dB])
RUSH_LEVEL = [(0, -54.5, 0.5), (2, -53, -0.5), (3.5, -52.5, -0.5), (4.8, -53, 2.5), (6.5, -53, 2),
              (9.64, -53, 2.5)]
# Peaks and notches of the cabinet panels: (frequency [Hz], width [Hz], gain [dB])
PANELS = [(122, 27, 3), (165, 8.5, -2), (197, 18.5, 8), (258, 17, 7), (308.5, 19, 7), (334, 11, 2),
          (375.3, 20, -10), (393, 15.4, 11.5), (418, 15, 6.5), (480, 12, -10.5), (490.6, 18, 10.5),
          (560, 14, 2), (559.4, 28, -9), (570, 13, 7), (777, 24, 5), (878, 26, 3.5), (940, 20, -0.5),
          (893, 6.6, 5), (1008, 19, 6.5)]
# Dark gaps in the background hiss that glide upward with the whine:
# (centre [shaft order], width [orders], gain [dB])
HISS_GAPS = [(30.6, 3, -4), (42.75, 2, -11), (50.6, 1.5, -16), (57.5, 2, -30), (67.2, 2, -24),
             (77.2, 2, -14), (84.5, 2.5, -9), (92.9, 2, -12), (105, 6, -8.5), (121, 3, -5), (139, 5, -2),
             (154, 3, -1), (165, 2, -2), (172, 5, 1.5)]
# How alike the two capsules hear the rush: (frequency [Hz], coherence [share])
COHERENCE = [(60, 0.99), (200, 0.26), (500, 0.72), (1000, 0.63), (2000, 0.021), (8000, 0.019)]
def air_and_water(speed, roar_hz=850, roar_octaves=.6):
    """Air and water noise, coloured by the cabinet panels, with gliding gaps and drifting patches."""
    frames, hz = N // 1024 + 5, np.fft.rfftfreq(4096, 1 / SR)
    at = np.minimum(np.arange(frames) * 1024, N - 1)
    right_re, right_im, own_re, own_im, patches = rng.standard_normal((frames, 2049, 5)).T
    coherence = spectrum_at(COHERENCE, hz)[:, None]
    right = right_re + 1j * right_im
    early = right * np.exp(2j * np.pi * hz * LEFT_LEAD_SAMPLES / SR)[:, None]
    left = coherence * early + np.sqrt(1 - coherence ** 2) * (own_re + 1j * own_im)
    patches_db = unit_rms(uniform_filter1d(uniform_filter1d(patches, 30, axis=0), 4, axis=1))
    panels_db = sum(db / (1 + (2 * (hz - centre) / width) ** 2) for centre, width, db in PANELS)
    order = hz[:, None] / speed[at]
    gaps_db = sum(db * np.exp(-2 * ((order - centre) / width) ** 2) for centre, width, db in HISS_GAPS)
    level_db, boost_db = curves(RUSH_LEVEL)
    roar_band = np.exp(-(np.log2((hz + 1) / roar_hz) / roar_octaves) ** 2)
    steady_db = spectrum_at(RUSH_SPECTRUM, hz) + panels_db
    colour = amp(steady_db[:, None] + gaps_db + np.outer(roar_band, boost_db[at]) + patches_db)
    _, noise = signal.istft(np.array([left, right]) * colour, nperseg=4096, noverlap=3072)
    return amp(level_db + 6.5) * unit_rms(noise[:, :N])


def tiled_room(x, direct, t60_s=.45):
    """Direct sound plus sparse, decaying reflections off the tiles, different at each capsule."""
    taps = np.zeros((2, 12000))
    at = np.arange(60, 11980, 20) + rng.integers(0, 20, (2, 596))
    np.put_along_axis(taps, at, rng.choice([-1., 1.], at.shape) * amp(-60 * at / SR / t60_s), 1)
    taps *= np.sqrt(1 - direct ** 2) / np.linalg.norm(taps, axis=1, keepdims=True)
    taps[0, 0] = taps[1, LEFT_LEAD_SAMPLES] = direct
    return signal.fftconvolve(x[None], taps, axes=1)[:, :N]


# The motor's balance where the microphone is held: (frequency [Hz], left-right [dB])
BALANCE = [(60, -14), (110, 0.0), (200, -7.5), (380, 4), (700, -6), (1290, 0.5), (2380, 0), (4400, -0.5),
           (8120, 10.5), (15000, 14.5)]
def microphone_balance(x):
    """The treble reaches the left capsule more strongly."""
    tilt_db = spectrum_at(BALANCE, np.fft.rfftfreq(N, 1 / SR)) / 2
    return irfft(rfft(x) * amp([tilt_db, -tilt_db]), N)


def amp(db):
    """Gain of a level in dB."""
    return 10 ** (np.asarray(db) / 20)


def unit_rms(x):
    """Scaled to rms 1."""
    return x / np.sqrt(np.mean(x ** 2) + 1e-20)


def spectrum_at(points, hz):
    """Value of a spectrum table, interpolated on a log-frequency axis."""
    table_hz, value = np.transpose(points)
    return np.interp(np.log(hz + 1), np.log(table_hz + 1), value)


def curves(rows):
    """Each column after the time as a curve over all samples."""
    times, *columns = np.transpose(rows)
    return [np.interp(TIME, times, column) for column in columns]


def drift(hz):
    """Random wander of rms 1, up to about hz."""
    steps = rng.standard_normal(int(N / SR * 2 * hz) + 2)
    return unit_rms(signal.resample(steps, next_fast_len(N + 2048))[:N])


def random_sine(turns):
    """Sine of peak 1 with a random starting phase."""
    return np.sin(2 * np.pi * (turns + rng.random()))


def tone(turns, db):
    """Sine along a phase in turns, at an rms level."""
    return np.sqrt(2) * amp(db) * np.sin(2 * np.pi * turns)


def stereo_tone(turns, lead, left_db, right_db):
    """One tone at both capsules, the left ahead by lead radians."""
    return np.array([tone(turns + lead / (2 * np.pi), left_db), tone(turns, right_db)])


def scene():
    """The machine from close by: whine in front, the motor's treble leaning left, pump and rush behind."""
    speed, steady_angle, angle = motor_shaft()
    strong = tiled_room(strong_orders(angle), direct=.97) + side_tones(angle)
    faint = faint_tones(angle) + brush_sparking(angle) + lesser_orders(speed, angle) + brush_scrape(angle)
    motor = microphone_balance(strong + tiled_room(faint, direct=.95))
    return commutator_whine(speed, steady_angle, angle) + motor + drain_pump() + air_and_water(speed)


def record(dry):
    """The handheld recorder cuts off steeply at 15750 Hz."""
    low_pass = signal.firwin(1023, 15750, window=("kaiser", 10), fs=SR)
    return signal.oaconvolve(dry, low_pass[None], "same", axes=1)


dry = scene()
out = record(dry)
unload_wav(out)
```